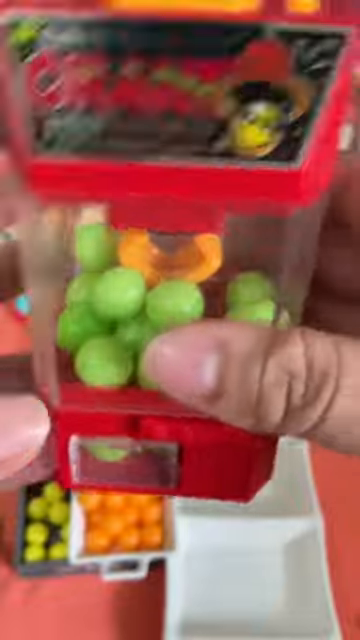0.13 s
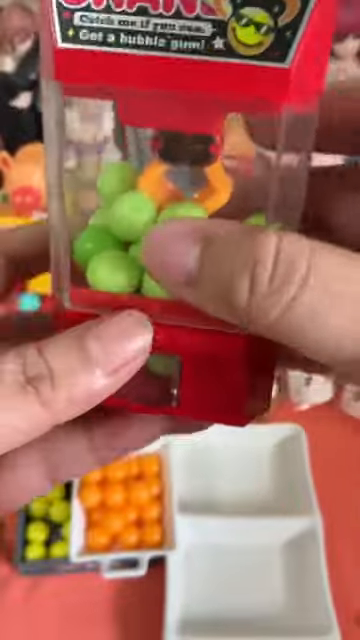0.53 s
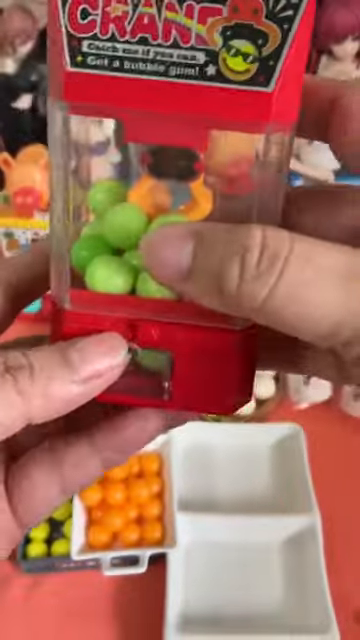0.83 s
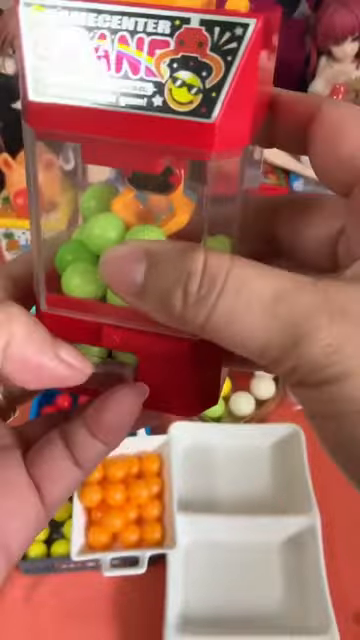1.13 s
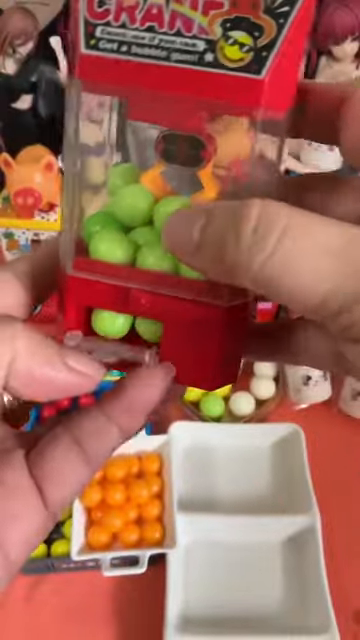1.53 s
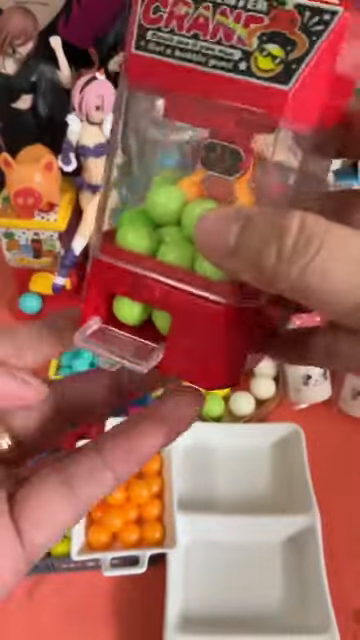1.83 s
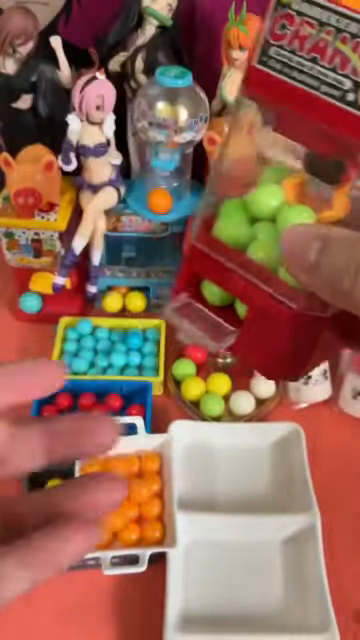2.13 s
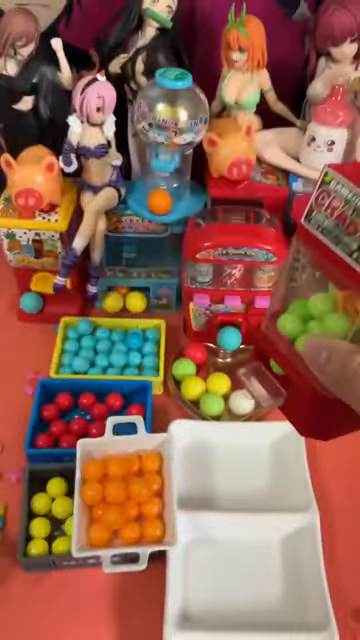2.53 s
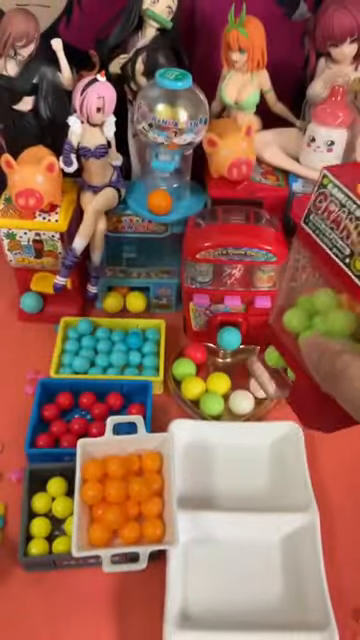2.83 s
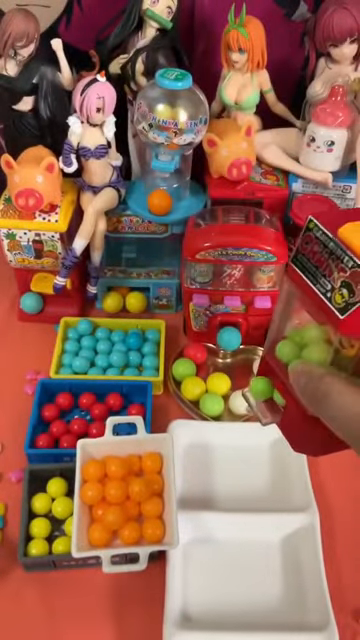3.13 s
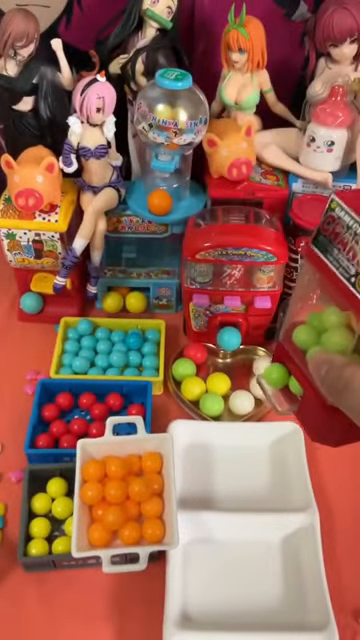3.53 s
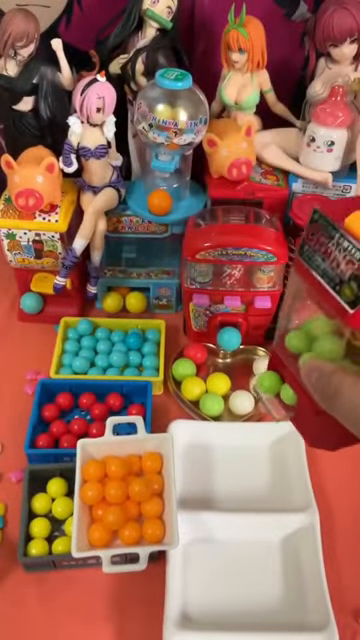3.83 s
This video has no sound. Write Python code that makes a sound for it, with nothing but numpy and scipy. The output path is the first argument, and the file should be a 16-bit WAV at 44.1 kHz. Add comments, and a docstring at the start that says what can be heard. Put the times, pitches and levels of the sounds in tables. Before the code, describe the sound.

Hard little balls click against a thin plastic toy close to the microphone, first in a light flurry, then scattered clicks and a sharp snap, ending with three loud rattling shakes in a quiet room.

```python
"""Hard balls click on the thin plastic walls of a small gumball toy, held and shaken close to a phone's microphone.
It is turned in the hands, its flap is opened and it is shaken: single clicks, and short rattles as balls tumble.
Each click is a chattering contact that rings a panel, the case and the ball; rattles are dense random taps.
Behind them fingers rustle on the plastic and a quiet room hums, both shaped noise; a short echo follows the toy."""
import sys
import numpy as np
from scipy import signal
from scipy.io import wavfile
from scipy.ndimage import uniform_filter1d

SR = 44100
rng = np.random.default_rng(int(sys.argv[2]) if len(sys.argv) > 2 else 0)


def generate_wav(sig):
    """Save sig (samples, or channels by samples) to the path in sys.argv[1] as 16-bit PCM at SR."""
    pcm = np.round(np.clip(np.atleast_2d(sig).T, -1, 1) * 32767).astype(np.int16)
    wavfile.write(sys.argv[1], SR, pcm)


N = 176400  # samples: 4 s

# Steady room noise. Each row: frequency in Hz, relative density in dB per Hz.
HUM_TONE = [(15, -66.5), (25, -20), (141, -5.5), (284, -11.5), (425, -15.5), (1100, -23), (1820, -30.5),
            (5910, -46), (7980, -41), (10000, -76), (13000, -101)]
# Bands that drone in the hum. Each row: centre in Hz, half-width in Hz (to 1/e of the boost), boost in dB.
HUM_DRONES = [(86, 9.5, 4.5), (139.5, 16, 4.5)]
# Loudness of the fingers rubbing the case. Each row: time in seconds, level in dB.
RUB_LEVEL = [(.07, -50), (.85, -62.5), (1.02, -61), (1.1, -52), (1.2, -59.5), (1.4, -70), (1.75, -52.5),
             (2, -65.5), (4, -60.5)]
# Colour of that rubbing. Each row: frequency in Hz, relative density in dB per Hz.
RUB_COLOUR = [(400, -16), (1200, -6), (2200, -14), (4000, -30)]
# Decay of the room. Each row: frequency in Hz, time to fall 60 dB in seconds.
ROOM_DECAY = [(1500, 0.38), (3500, 0.41), (8000, 0.36)]
# Modes of the plastic case. Each row: frequency in Hz, level in dB.
CASE_MODES = [(470, -14), (1150, -12.5), (1400, -7.5), (1680, -2.5), (2000, -2.5), (2300, -3), (2670, -1),
              (2940, 1.5), (3300, -6.5), (3620, -13), (3760, -1), (4300, -8), (4850, -8.5)]
# Treble modes of the balls and rims. Each row: frequency in Hz, level in dB.
BALL_MODES = [(5300, -9.5), (6150, -2.5), (6600, -1.5), (7800, -2), (8200, -2.5), (8600, -2)]
# Tumbles of the heap of balls. Each row: loudest moment in seconds, level in dB, build-up in dB per s,
# settling in dB per s, treble in dB and lower case modes in dB (both against the level, before their trims).
TUMBLES = [(0.087, -34.5, 2000, 178.5, -6, 3.5), (0.138, -51, 291, 300.5, -12, 12.5),
           (.30, -43, 297, 240.5, -8, 9.5), (0.48, -37.5, 1497.5, 205.5, -2.5, 6),
           (0.588, -47, 1512, 177.5, 4, 7), (1.266, -35, 1509, 339, -2, 5.5),
           (1.558, -46, 1996.5, 92, -5, 2), (1.66, -46, 312.5, 307, 8.5, -16),
           (1.77, -45, 199.5, 197.5, -4, 5), (2.626, -50, 804.5, 155.5, -5, 8.5),
           (2.9, -40.5, 698.5, 215, -1, 12), (2.945, -15, 899, 275.5, -1, -3.5),
           (3.328, -16.5, 1302, 293, -2.5, 1), (3.687, -20, 644, 335.5, 0.5, 0.5),
           (3.848, -47, 1490, 217, -2, 5.5), (3.963, -34.5, 698.5, 304.5, -4, 5),
           (3.998, -21, 906, 296, 3, 4)]
# The clearest clicks. Each row: main contact in seconds, level in dB, pitch of the struck panel in Hz,
# treble in dB against the level (before its trim), build-up in ms (growth by e^1.5; at least 0.3 ms is used).
BALL_CLICKS = [(0.0741, -28.5, 2180, -4, 0.79), (0.083, -26, 2700, -4, 2.5),
               (0.0936, -22.5, 2770, -12, 0.96), (0.1337, -23.5, 2160, -21, 3.1),
               (0.137, -24.5, 3220, -14, 1.5), (0.151, -22, 2030, -15.5, 4.5),
               (0.1853, -30.5, 2800, -6.5, 0.59), (0.2152, -33.5, 3600, -7, 3.5),
               (0.2606, -21, 2080, -14, 0.18), (0.2714, -34.5, 2110, 4.5, 4.6), (0.2807, -32, 2180, 3, 1.9),
               (0.3008, -27, 2270, -11, 2.2), (0.338, -17.5, 2310, -18.5, 0.33),
               (0.4008, -36.5, 2220, -43, 1.6), (0.4306, -37.5, 1860, -2, 2.1),
               (0.4709, -28, 2120, -20, 3.8), (0.4886, -33, 2100, 1, 4.1), (0.519, -31.5, 2070, -15, 0.97),
               (0.589, -21, 3020, -1, 1.2), (0.6046, -33.5, 2900, -4, 1.1), (0.659, -31.5, 2660, -31, 0.7),
               (0.73, -49.5, 2550, 2, 1), (0.7848, -40.5, 2210, -49, 0.42), (0.9922, -33, 2500, 1.5, 0.25),
               (1.1032, -30, 2570, 2, 0.78), (1.203, -47.5, 2800, -17, 1), (1.2333, -30.5, 4370, 0.5, 1.5),
               (1.2572, -17, 4500, -39, 0.44), (1.2647, -27.5, 2740, -21, 1.5),
               (1.2815, -22.5, 2810, -19, 2.8), (1.314, -34.5, 2250, -9.5, 1.5),
               (1.4097, -44, 3070, 14, 0.92), (1.5505, -27.5, 2800, 3.5, 1.5), (1.611, -21.5, 2650, -17, 1),
               (1.6202, -27, 2690, -13.5, 1.5), (1.6527, -19, 3050, -0.5, 6.6),
               (1.654, -24.5, 4120, -30, 6.1), (1.712, -33, 2730, -13, 1.6), (1.7625, -9, 3005, -18, 0.5),
               (1.77, -19.5, 3010, -6, 1.6), (1.779, -22.5, 2950, -43, 1.4), (1.8253, -26, 1940, -14, 0.29),
               (1.84, -30, 2730, -16, 1.1), (1.8879, -14.5, 2910, -20, 1.7), (1.9, -34, 3000, -21.5, 1),
               (1.962, -38, 1910, -16, 0.89), (2.3766, -35.5, 2040, -37, 1.2),
               (2.574, -47.5, 1740, -2, 2.3), (2.618, -25, 1566, -9, 0.43), (2.866, -38, 1560, -6, 0.64),
               (2.8919, -35.5, 2100, 0, 1.4), (2.9329, -13, 3650, -3, 1.6), (2.9372, -5.5, 3680, -8, 1.5),
               (2.9461, -4, 3700, -16.5, 0.81), (2.9514, -11.5, 2930, -10, 0.58),
               (2.9543, -11.5, 3450, -1, 0.73), (2.963, -11.5, 3560, -18, 0.66),
               (2.9791, -16.5, 3110, -5, 1.4), (3.0439, -19, 3800, -7.5, 1.3),
               (3.199, -43.5, 2800, -15, 1.2), (3.2943, -39.5, 3700, -2.5, 0.71),
               (3.3035, -31.5, 2730, -24.5, 2.5), (3.3248, -21.5, 3120, 0, 2.4),
               (3.3369, -4.5, 3740, -19, 1.3), (3.344, -16, 2870, 3.5, 0.49), (3.3504, -13, 2980, -8, 1.3),
               (3.466, -27, 2830, -22, 0.22), (3.5732, -42.5, 3640, -15, 1), (3.614, -32.5, 2070, -35, 1.1),
               (3.6462, -27, 2850, -12, 0.6), (3.657, -19.5, 2320, -8.5, 0.32),
               (3.667, -15, 3740, -17, 0.63), (3.6737, -10, 3000, -2.5, 1.6),
               (3.6796, -11, 3930, -6.5, 0.45), (3.6966, -17, 3670, 0.5, 1.7), (3.708, -20, 3880, -16, 0.8),
               (3.7173, -22, 3750, -14, 1.2), (3.8413, -24, 3880, 0, 0.64), (3.9062, -31, 2430, -12.5, 1.4),
               (3.931, -33.5, 2550, -10, 1.4), (3.9608, -33.5, 2760, 11, 8.6),
               (3.971, -12.5, 3170, -25, 0.27)]

HUM_DB = -52
ROOM_DB, CLICK_ROOM_DB, PANEL_ROOM_DB = -14, 0.5, -12  # the panel faces the microphone: little goes to the room
PANEL_T60, CASE_T60, BALL_T60 = .010, .013, .008  # s to fall 60 dB
MODE_SCATTER_DB, MODE_SCATTER_SHARE = 2.5, 0.031  # spread of mode level and of mode pitch
THIN_HZ = 710  # the small case radiates little below this
TAPS_PER_S, TAP_SPREAD_DB = 970, 3  # tap rate where busy is 1; dB per unit of random force
THINNING = .7  # taps get rarer by this share of the dB a tumble has lost
LOWER_DB, RATTLE_TREBLE_DB = -5.5, -10.5  # trims of the rattles
CASE_DB, TICK_DB, CRACK_DB = -2.5, -1.5, -9  # trims of the clicks
CASE_PER_TREBLE = 0.33  # dB of case per dB of treble
CHATTER_S, CRACK_CYCLES = .0018, .8  # times to fall to 1/e, in s and in cycles of the panel
START_S = .0715  # sound begins after a short silence
NOTCH_HZ, NOTCH_WIDTH_HZ, NOTCH_SHARE = 7200, 550, .8  # dip in the microphone's treble
EDGE_HZ = 9150  # upper band limit


def gain_of(db):
    """Decibels to gain."""
    return 10 ** (np.asarray(db) / 20)


def evened(x):
    """Scales to rms 1."""
    return x / np.sqrt(np.mean(x ** 2) + 1e-20)


def read(points, hz):
    """Reads a table on a log-frequency axis."""
    f, value = np.transpose(points)
    return np.interp(np.log(hz + 1), np.log(f + 1), value)


def add(mix, s, sound):
    """Mixes a sound in at a time in seconds."""
    part = mix[round(s * SR):][:len(sound)]
    part += sound[:len(part)]


def noise(shape_db, patchy_db):
    """Noise from random short-time spectra with drifting louder and softer patches, rms 1."""
    real, imaginary, patches = rng.standard_normal((N // 512 + 5, 1025, 3)).T
    patches = uniform_filter1d(patches, size=24, axis=0)  # smooth along frequency
    patches = evened(uniform_filter1d(patches, size=8, axis=1))  # and along time
    colour_db = shape_db(np.fft.rfftfreq(2048, 1 / SR))[:, None]
    spectra = (real + 1j * imaginary) * gain_of(colour_db + patchy_db * patches)
    return evened(signal.istft(spectra, nperseg=2048, noverlap=1536)[1][:N])


def hum():
    """Steady room noise, strongest in the bass, with two droning bands."""
    def colour(hz):
        """Broad hum plus bell-shaped boosts, in dB."""
        drones = sum(db * np.exp(-((hz - f) / width) ** 2) for f, width, db in HUM_DRONES)
        return read(HUM_TONE, hz) + drones
    return gain_of(HUM_DB) * noise(colour, patchy_db=1.2)


def rub():
    """Soft skin-on-plastic rustle: coloured noise that swells and fades with the fingers."""
    level_db = np.interp(np.arange(N) / SR, *np.transpose(RUB_LEVEL))
    return gain_of(level_db) * noise(lambda hz: read(RUB_COLOUR, hz), patchy_db=2.5)


def room(x):
    """Three tails of sparse random reflections take turns; each band dies at its own speed."""
    out = np.zeros(N)
    turn = 2 * np.pi * 60 * np.arange(N) / SR
    for k in range(3):
        taps, at = np.zeros(SR // 2), np.arange(200, SR // 2 - 20, 20)
        taps[at + rng.integers(0, 20, len(at))] = rng.choice([-1., 1.], len(at))
        hz, t, spectra = signal.stft(taps, SR, nperseg=256)
        fade = gain_of(-60 * t / read(ROOM_DECAY, hz)[:, None])
        tail = signal.istft(spectra * fade, SR, nperseg=256)[1]
        share = x * np.cos(turn + k * np.pi / 3)
        out += signal.fftconvolve(share, tail / np.linalg.norm(tail))[:N]
    return out


def ring(modes, t60, chance):
    """Decaying modes of a struck body; chance, standing for the spot struck, scatters level and pitch."""
    t = np.arange(1400) / SR
    hz, db = np.transpose(modes)[:, :, None]
    c = chance[:len(modes), None]
    decay = gain_of(db + MODE_SCATTER_DB * c - 60 * t / t60)
    waves = decay * np.sin(2 * np.pi * hz * (1 + MODE_SCATTER_SHARE * c[::-1]) * t)
    signs = (-1) ** np.arange(len(modes))[:, None]
    return (waves * signs).sum(0)


def rattles():
    """Dense random taps on 16 spots of the case, swelling with each tumble and thinning as it settles."""
    t, swells = np.arange(N) / SR, np.zeros((3, N))  # lower case modes, upper case modes, balls
    busy = np.full(N, .04)
    for s, db, rise_db, fall_db, treble_db, lower_db in TUMBLES:
        swell = db + np.minimum(rise_db * (t - s), fall_db * (s - t))
        swells += gain_of(swell + np.array([[lower_db + LOWER_DB], [0], [treble_db + RATTLE_TREBLE_DB]]))
        building = (t < s) & (swell > db - 40)
        busy = np.maximum(busy, gain_of(THINNING * (swell - db)) + .2 * building)  # denser while building
    force = gain_of(TAP_SPREAD_DB * np.minimum(rng.exponential(1, N), 3))
    hit = rng.random(N) < busy * TAPS_PER_S / SR
    taps = force * hit / np.sqrt(busy)  # rarer taps are stronger, so density leaves the power alone
    spot, chance = rng.integers(0, 16, N), rng.standard_normal((16, 32))
    parts = []
    for modes, t60, at in ((CASE_MODES[:6], CASE_T60, 0), (CASE_MODES[6:], CASE_T60, 6),
                           (BALL_MODES, BALL_T60, 16)):
        part = sum(signal.oaconvolve(taps * (spot == k), ring(modes, t60, c[at:]))[:N]
                   for k, c in enumerate(chance))
        parts.append(evened(part))
    return (swells * parts).sum(0)


def clicks():
    """A ball chatters on a wall: a crack, a panel ringing in two modes, the case answering, the ball ticking."""
    body, panels = np.zeros(N), np.zeros(N)
    chance = rng.standard_normal((len(BALL_CLICKS), 1032))
    t = (np.arange(1000) - 400) / SR
    after = np.maximum(t, 0)
    for (s, db, hz, treble_db, rise_ms), c in zip(BALL_CLICKS, chance):
        rise = np.exp(np.minimum(t, 0) * 1500 / max(rise_ms, .3))
        chatter = c[32:] * rise * np.exp(-after / CHATTER_S)
        chatter[400] = np.linalg.norm(chatter) * 1.6  # the main contact
        case = np.convolve(chatter, ring(CASE_MODES, CASE_T60, c))
        tick = np.convolve(chatter, ring(BALL_MODES, BALL_T60, c[16:]))
        sound = gain_of(CASE_DB + CASE_PER_TREBLE * (treble_db + 18.0)) * case / abs(case).max()
        sound += gain_of(treble_db + TICK_DB) * tick / abs(tick).max()
        first_mode = np.sin(2 * np.pi * hz * t)
        second_mode = .4 * np.sin(2 * np.pi * hz * (1 + c[31] / 6) * t)
        sound[:1000] += gain_of(CRACK_DB) * np.exp(-abs(t) * hz / CRACK_CYCLES) * first_mode
        panel = gain_of(db - 60 * after / PANEL_T60) * rise * (first_mode + second_mode)
        add(body, s + t[0], gain_of(db) * sound)
        add(panels, s + t[0], panel)
    return body, panels


def scene():
    """The toy close by, its echo in the room, the hands and the hum."""
    thin = signal.butter(3, THIN_HZ, "high", fs=SR, output="sos")
    body, panels, many = signal.sosfilt(thin, [*clicks(), rattles()])
    sent = gain_of(CLICK_ROOM_DB) * body + gain_of(PANEL_ROOM_DB) * panels + many
    echo = gain_of(ROOM_DB) * room(sent)
    return (body + panels + many + echo + rub() + hum())[None]


def record(dry):
    """A short silence, a soft ceiling on the loudest peaks, a treble dip, then the band limit."""
    x = dry * np.clip((np.arange(N) / SR - START_S) / 0.00056, 0, 1)
    bent = np.sign(x) * (.6 + .22 * np.tanh((abs(x) - .6) / .22))
    held = np.where(abs(x) > .6, bent, x)
    notched = signal.lfilter(*signal.iirnotch(NOTCH_HZ, NOTCH_HZ / NOTCH_WIDTH_HZ, SR), held)
    dipped = held + NOTCH_SHARE * (notched - held)
    band = signal.firwin(301, EDGE_HZ, window=("kaiser", 7), fs=SR)
    return signal.oaconvolve(dipped, band[None], "same")


dry = scene()
out = record(dry)
generate_wav(out)
```